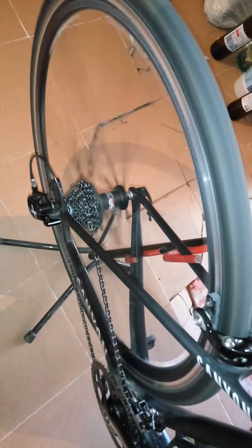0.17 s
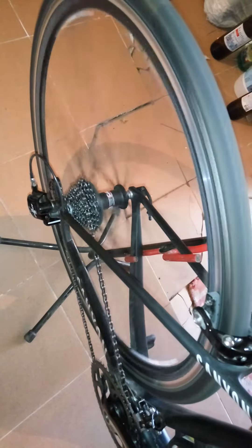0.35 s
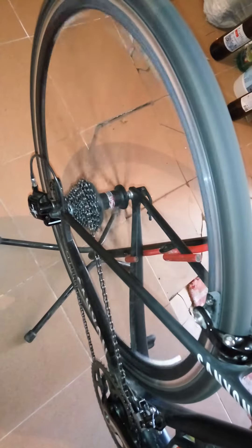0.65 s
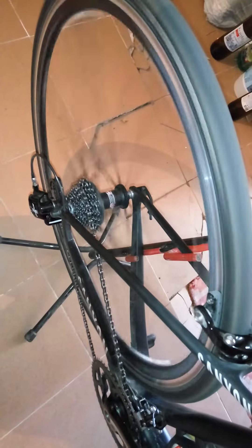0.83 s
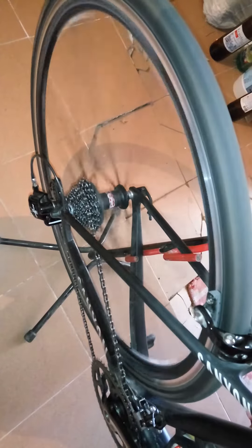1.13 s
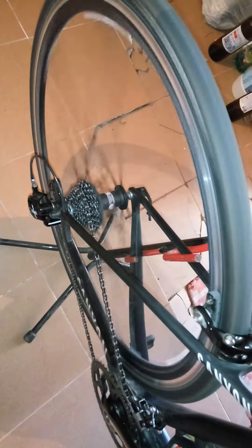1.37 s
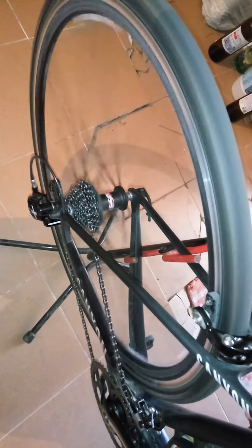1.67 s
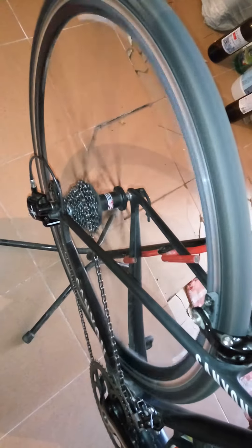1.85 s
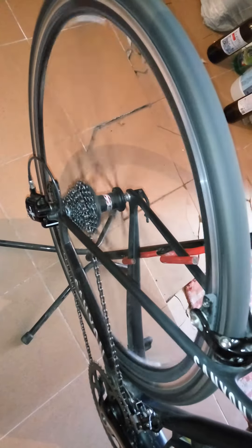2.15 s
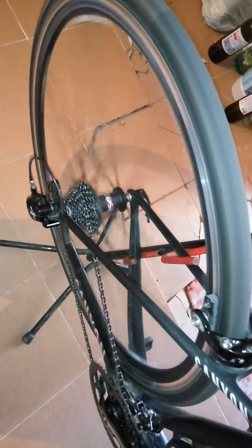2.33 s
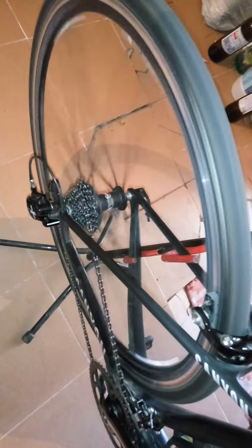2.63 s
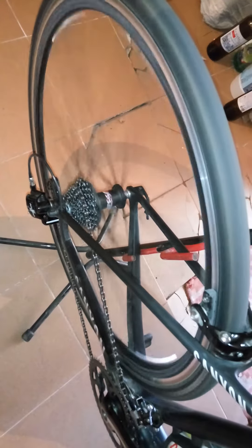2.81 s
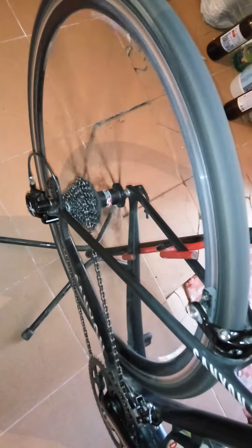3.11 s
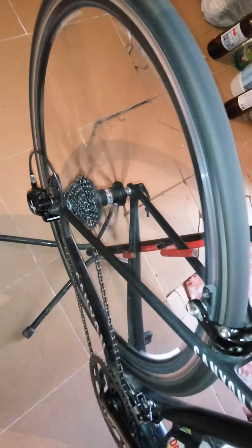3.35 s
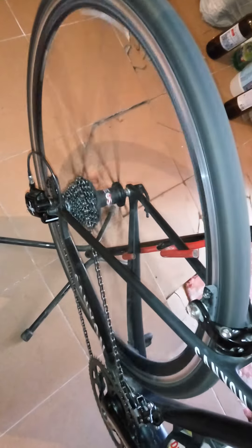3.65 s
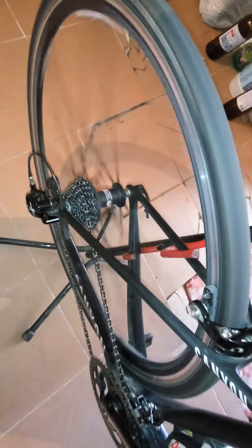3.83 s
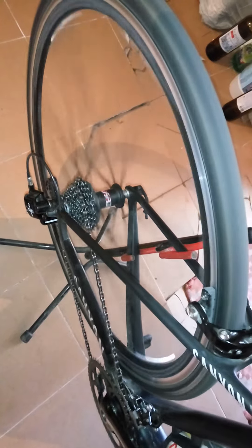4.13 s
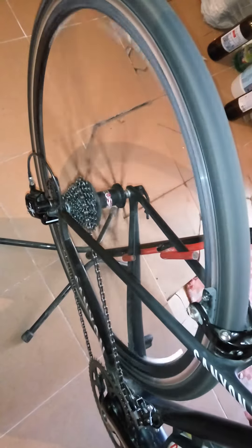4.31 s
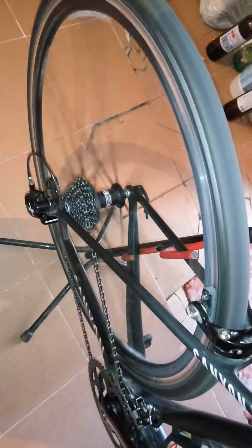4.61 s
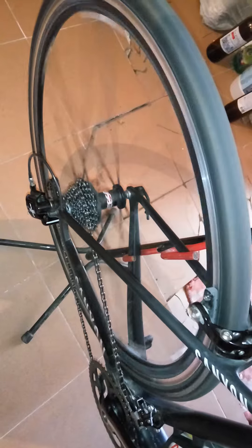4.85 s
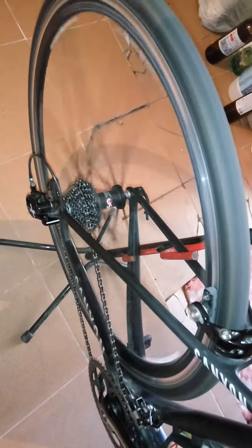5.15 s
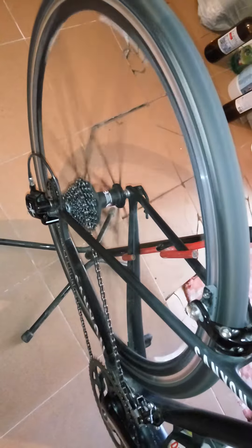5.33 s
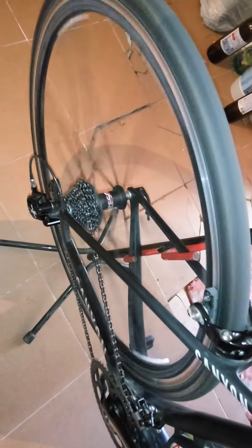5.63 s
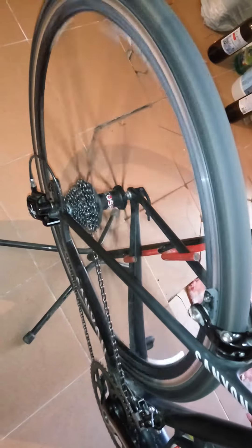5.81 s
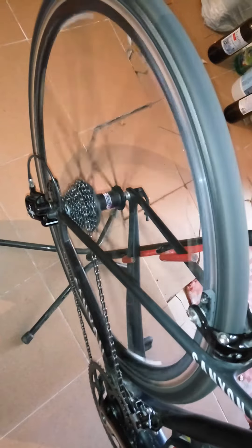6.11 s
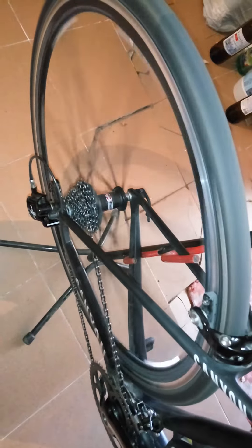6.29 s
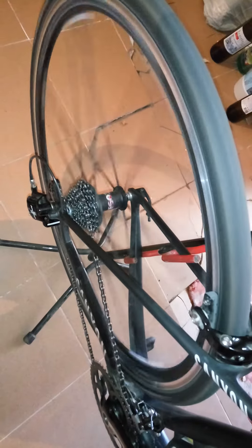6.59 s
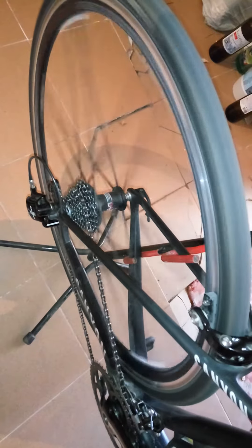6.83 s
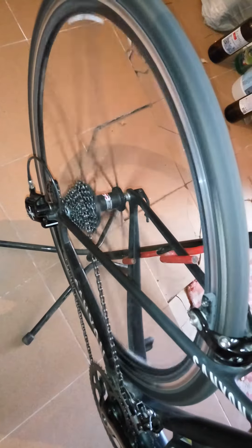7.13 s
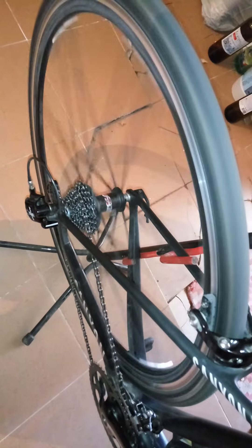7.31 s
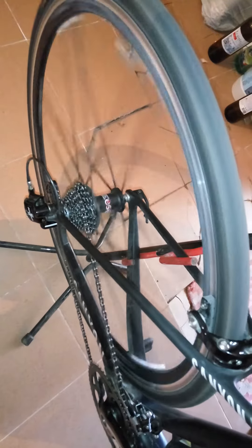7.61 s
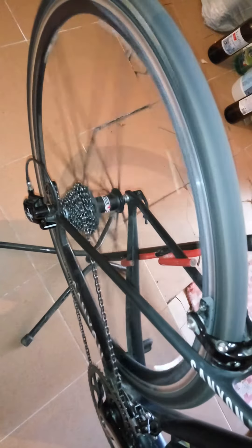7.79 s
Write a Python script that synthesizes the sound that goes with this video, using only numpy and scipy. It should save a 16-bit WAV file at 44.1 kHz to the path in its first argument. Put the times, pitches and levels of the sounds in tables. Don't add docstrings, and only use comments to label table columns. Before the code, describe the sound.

Fast metallic freewheel clicking slowly winds down in a tiled room over a faint hum, interrupted once by finger bumps and two sharp pops.

```python
import sys
import numpy as np
from scipy import signal
from scipy.fft import rfft, irfft, next_fast_len
from scipy.io import wavfile
from scipy.ndimage import uniform_filter1d, minimum_filter1d

SR = 44100
rng = np.random.default_rng(int(sys.argv[2]) if len(sys.argv) > 2 else 0)


def boost(x):
    u = np.asarray(x, float) / 20
    return 10 ** u


def bounce(signal):
    frames = np.transpose(np.atleast_2d(signal))
    limited = np.clip(frames, -1, 1)
    pcm = np.round(limited * 32767).astype(np.int16)
    wavfile.write(sys.argv[1], SR, pcm)


N = 351036


def unit(x):
    return x / np.sqrt(np.mean(x ** 2) + 1e-30)


def even(rows):
    return _even(rows)


def _even(rows):
    energy = np.sum(rows ** 2, axis=-1, keepdims=True)
    return rows / np.sqrt(energy)


def along(points, hz):
    f, v = np.transpose(points)
    return np.interp(np.log(hz + 1), np.log(f + 1), v)


# (frequency [Hz], left minus right [dB])
PORT_BALANCE = [(60, -0.5), (110, 1), (200, -2.5), (380, -1.5), (700, 6.5), (1290, -4), (2380, -3),
                (4400, 14), (8120, -10.5), (15000, 4)]


def coloured(x, spectrum, lean=0):
    hz = np.fft.rfftfreq(x.shape[-1], 1 / SR)
    sides = 1
    if lean:
        sides = boost(lean * along(PORT_BALANCE, hz) * np.array([[.5], [-.5]]))
    return unit(irfft(rfft(x) * boost(along(spectrum, hz)) * sides, x.shape[-1]))


def narrow(hz, width_hz):
    m = next_fast_len(N)
    f = np.arange(4000) * SR / m
    phasor = np.exp(2j * np.pi * rng.random((2, len(f))))
    response = 1 / (1 + (2 * (f - hz) / width_hz) ** 2)
    common, difference = unit(irfft(phasor * response, m)[:, :N])
    return common + .3 * np.array([difference, -difference])


def wobble(rate):
    knots = rng.standard_normal((2, int(N * rate / SR) + 2))
    return np.array([np.interp(np.arange(N) * rate / SR, np.arange(len(k)), k) for k in knots])


def tone(hz, drift_hz):
    drift, skew = wobble(4.7)
    phase = 2 * np.pi * np.cumsum(hz + drift_hz * drift) / SR
    return np.sqrt(2) * np.sin(phase + 0.53 * skew * np.array([[1], [-1]]))


def swells(rows, edge_s):
    t = np.arange(N) / SR
    ramps = [boost(db) * np.clip(np.minimum(t - s, s + length - t) / edge_s, 0, 1) for s, length, db in rows]
    return np.sqrt(np.sum(np.square(ramps), axis=0))


# (frequency [Hz], density [dB per Hz])
AIR = [(15, -45), (25, -16), (141, -7), (195, -2.5), (301, -10), (394, -15), (439, -12.5), (911, -15.5),
       (2610, -10), (3250, -13), (4250, -12.5), (6210, -12.5), (8140, -23.5), (12200, -24.5), (15400, -31)]
# (frequency [Hz], left-right likeness [0 to 1])
COHERENCE = [(60, 0.57), (200, 0.76), (600, .5), (1300, .03)]


def air():
    hz = np.fft.rfftfreq(N, 1 / SR)
    turn = np.arccos(np.clip(along(COHERENCE, hz), 0, 1)) / 2
    mid, side = irfft(rfft(rng.standard_normal((2, N))) * [np.cos(turn), np.sin(turn)], N)
    return boost(-69) * coloured(np.array([mid + side, mid - side]), AIR)


# (frequency [Hz], level [dB])
HUM = [
    (199.2, -75),
    (242.2, -83.5),
    (344.5, -90.5),
    (393.0, -81),
    (538.3, -87),
]
# (start [s], length [s], level [dB])
THROBS = [(-.1, 0.2, -67), (.12, 0.14, -64.5), (.32, 0.22, -66), (.6, 0.54, -77), (1.2, 0.34, -67.5),
          (1.62, 0.5, -72.5), (1.8, 0.23, -67), (2.12, .2, -71.5), (2.42, 0.95, -72.5), (3.36, 0.36, -70),
          (3.78, 0.24, -70), (4.05, 0.16, -63.5), (4.28, 0.2, -70.5), (4.66, 0.62, -71.5),
          (5.33, 0.31, -73.5), (5.7, 0.19, -74), (5.95, 0.39, -72), (6.31, 0.23, -67.5),
          (6.62, 0.39, -66.5), (7.11, 0.2, -62), (7.44, 0.22, -76), (7.76, .3, -71)]


def appliance():
    lines = sum(boost(db + 1.5 * wobble(5.7)) * tone(hz, drift_hz=0.51) for hz, db in HUM[1:])
    throb = np.hypot(boost(-80.5), swells(THROBS, edge_s=0.12))
    return lines + throb * tone(HUM[0][0] - 2.5, drift_hz=2.9)


# (start [s], length [s], level [dB], frequency [Hz])
SPELLS = [
    (0.196, .65, -82.5, 72),
    (.95, .3, -83, 105),
    (2.25, 1.25, -77, 72.6),
    (3.746, 0.53, -78.5, 68),
    (5.204, 0.29, -83.5, 69.9),
    (5.75, 0.52, -81.5, 111),
    (7.05, 0.27, -82, 100.5),
    (7.35, 0.43, -81, 67.8),
]


def rumble():
    spells = sum(swells([row[:3]], edge_s=0.11) * narrow(row[3], width_hz=18) for row in SPELLS)
    return spells + boost(-90) * narrow(75, width_hz=50)


def room():
    return air() + appliance() + rumble()


# (start [s], length [s], level [dB], hiss over it [dB])
STROKES = [
    (2.803, .03, -62, 16),
    (2.939, 0.036, -49, -13),
    (2.971, 0.07, -43, -5.5),
    (3.026, 0.058, -51, -6),
    (3.057, 0.1167, -44.5, -7),
    (3.155, .03, -56, -2),
    (3.182, 0.036, -42.5, -1),
    (3.194, 0.08, -44.5, -8.5),
]


def sliding():
    edge_s = .018
    body = swells([row[:3] for row in STROKES], edge_s)
    hiss = swells([(s, length, db + hiss_db) for s, length, db, hiss_db in STROKES], edge_s)
    t = np.arange(N) / SR
    rush_t60 = 0.11
    rush = sum((t > s + .003) * boost(db - 60 * np.abs(t - s) / rush_t60) for s, db, *_ in POPS[::2])
    rush_bands = boost([-30.5, -31.5, -35.5])[:, None]
    return np.hypot([boost(-2) * body, body, hiss], rush_bands * rush)


# (time [s], thud level [dB], thud frequency [Hz], tick level [dB])
TAPS = [(2.271, -36, 152, -70), (2.30, -48.5, 200, -77), (2.329, -55, 199, -80), (2.688, -44.5, 200, -61),
        (2.708, -43.5, 160, -72), (2.718, -51, 300, -45), (2.754, -45, 300, -47), (2.767, -40, 352, -58),
        (2.794, -41, 119, -77.5), (2.821, -34, 185, -62), (2.875, -35.5, 119, -70), (2.957, -26, 452, -49),
        (2.964, -31, 500, -24)]
# (time [s], snap level [dB], snap length [ms], recoil level [dB], crackle level [dB])
POPS = [
    (2.968, 3.5, 0.56, 5, -4),
    (2.9714, -5, 0.6, -10, -29),
    (3.1798, -1.5, 0.29, -5.5, -23),
    (2.786, -25.5, .55, -29, -24),
]
# (frequency [Hz], level [dB])
SKIN = [
    [(60, -24.5), (150, -4), (400, 1.5), (800, -11), (1500, -43)],
    [(300, -28), (700, -0.5), (1500, -4), (2800, -10), (5000, -41.5)],
    [(1500, -28), (3000, -7.5), (5500, 1.5), (7200, -8.5), (8500, -32), (13000, -40.5), (15500, -67)],
]
# (frequency [Hz], level [dB])
CRACKLE = [(2000, -29.5), (3800, -16), (5600, 5), (8000, -12.5), (11000, -8), (13500, -20.5),
           (16500, -16.5)]


def finger():
    x, t = np.zeros(N + SR), np.arange(4410) / SR
    for s, db, hz, tick_db in TAPS:
        swing = boost(db + 8 - 29 * hz * t) * (1 - np.exp(-9 * hz * t))
        thud = -np.sin(2 * np.pi * hz * t) * swing
        tick = coloured(rng.standard_normal(len(t)), SKIN[2]) * boost(tick_db - 60 * t / 0.0046)
        x[round(s * SR):][:len(t)] += thud + tick
    for s, snap_db, ms, recoil_db, crackle_db in POPS:
        hz = 152 / np.sqrt(ms)
        after = np.clip(t - ms / 1000, 0, None)
        snap = -boost(snap_db) * np.sin(np.pi * np.clip(t * 1000 / ms, 0, 1)) ** 1.8
        swing_back = np.sin(2 * np.pi * (hz * after) ** .7 * 1.1)
        recoil = boost(recoil_db - 60 * after / .0065) * swing_back
        crackle = boost(crackle_db - 60 * t / 0.0045) * coloured(rng.standard_normal(len(t)), CRACKLE)
        x[round(s * SR):][:len(t)] += snap + recoil + crackle
    grain = boost(2.0 * wobble(300)[0])
    rub = 0
    for gain, band in zip(sliding(), SKIN):
        rub = rub + gain * unit(grain * coloured(rng.standard_normal(N), band))
    port = signal.butter(3, 95, "high", fs=SR, output="sos")
    muffle = signal.butter(1, 7000, fs=SR, output="sos")
    left = signal.sosfilt(np.vstack([port, muffle]), x[:N] + rub)
    return np.array([left, np.zeros(N)])


# (count, rate [1/s], then [1/s2], [1/s3])
SPIN = (-.530, 29.0438, -.914005, .00435383)
TEETH, PAWLS = 30, 3


def ticks():
    t = np.arange(N) / SR
    passed = np.polyval(SPIN[::-1], t)
    tooth = np.arange(int(passed[-1]) + 1)
    s = np.interp(tooth, passed, t)
    rate = np.interp(s, t, np.gradient(passed) * SR)
    speed = rate / SPIN[1]
    angle = 2 * np.pi * tooth / TEETH
    heavy_spot_s = .0005
    s = s + heavy_spot_s * speed ** -3.0 * np.cos(angle)
    pawl_db = 2 * np.cos(PAWLS * angle + 2.77)
    oval_db = .5 * np.cos(2 * angle - .9)
    tick_db = -55.5 + 3 * np.log2(speed)
    return s, boost(tick_db + pawl_db + oval_db)


def laid(rows, s):
    at = (np.round(s * SR).astype(int)[:, None] + np.arange(rows.shape[-1])).ravel()
    return np.array([np.bincount(at, rows[:, c].ravel(), N + SR)[:N] for c in range(2)])


def burst(count, size, spectrum, tint_db, tint_bins):
    tint = uniform_filter1d(rng.standard_normal((count, 2, size // 2 + 1)), tint_bins, axis=2)
    noise = rfft(rng.standard_normal((count, 2, size)))
    return coloured(irfft(noise * boost(tint_db * unit(tint)), size), spectrum, lean=0.98)


# (frequency [Hz], level [dB], t60 [s])
METAL = [(1084, -12.5, 0.34), (1210, -14.5, 0.52), (1450.4, -12.5, 0.44), (1745, -9, 0.22),
         (2310, -5.5, 0.13), (2632, -0.5, .2), (3015, -7.5, 0.18), (3566, -10, .16), (4190, -6.5, 0.44),
         (4280, -3.5, 0.66), (4808, 1.5, 0.12), (5370, -2, .12), (5720, -6.5, 0.043), (5700, 1, 0.069),
         (5950, -7, .12), (6260, -8.5, .1), (7300, -18.5, .06), (9400, -19.5, 0.12), (9850, -18, 0.051),
         (11900, -21.5, .04)]


def notes(count, size):
    z = np.zeros((count, 2, size // 2 + 1), complex)
    for hz, db, t60 in METAL + METAL[3:13]:
        near = np.arange(-100, 101) + round(hz * size / SR)
        detune, loud, turn = rng.standard_normal((count, 3, 2, 1)).swapaxes(0, 1)
        off = 2j * np.pi * (near * SR / size - hz * (1 + .008 * detune))
        fade = np.log(1000) / min(t60, .26)
        build = 1 / 0.0012
        phase = np.exp(9j * turn - 2j * np.pi * near * 44 / size)
        z[..., near] += boost(db + 5 * loud) * phase / (fade + off) / (build + off)
    return even(irfft(z, size))


# (frequency [Hz], density [dB per Hz])
CRACK = [(290, -45), (500, -14), (530, -10.5), (1230, -17.5), (1320, -23), (1690, -4.5), (3200, -5.5),
         (4280, -1), (6330, 0.5), (8090, -18), (12100, -13.5), (15400, -27)]
# (frequency [Hz], density [dB per Hz])
WASH = [(410, -41), (700, -18.5), (1330, -14), (2630, -1), (3200, -6), (4320, -6.5), (6230, -10.5),
        (8210, -19), (12200, -19), (15400, -27)]


def freehub():
    s, force = ticks()
    count, size = len(s), 8192
    t = np.arange(size) / SR
    late = 0.0012 * np.cumsum(rng.gamma(2, .5, (count, PAWLS)), axis=1) - .0012
    since = np.clip(t[:2048] - np.clip(late, 0, .0045)[..., None], 0, None)
    pawl = boost(rng.normal(0, 2.2, (count, PAWLS, 1)))
    decay = boost(-60 * since / .011) + boost(-7.5 - 60 * since / 0.065)
    hit = decay * (1 - np.exp(-since / 0.00028))
    shape = np.sqrt(np.sum((pawl * hit) ** 2, axis=1))[:, None]
    crack = even(shape * burst(count, size=2048, spectrum=CRACK, tint_db=5, tint_bins=22))
    wash_shape = boost(-60 * t / 0.14) * (1 - np.exp(-t / 0.0037))
    wash = even(wash_shape * burst(count, size, WASH, tint_db=0.5, tint_bins=40))
    force = force[:, None, None] * boost(rng.normal(0, .6, (count, 2, 1)))
    ringing = boost(22.0) * wash + boost(26.5) * notes(count, size)
    return laid(force * boost(26.0) * crack, s) + laid(force * ringing, s)


def scene():
    return freehub() + room() + finger()


# (frequency [Hz], weakest kept line over the usual level [dB])
THRESHOLD = [(4500, -40), (6000, -14), (7400, -6), (8200, 3), (8900, -1), (11000, 0), (12500, -1),
             (13200, 8), (15300, 8), (15600, 34)]


def thinned(x, size):
    hz, t, z = signal.stft(x, SR, "cosine", size)
    level = np.abs(z)
    median = np.median(level[..., ::3], axis=2, keepdims=True)
    usual = uniform_filter1d(median, size // 80, axis=1)
    luck_db = rng.normal(0, 4.6, (50, 400)) + rng.normal(0, 1.6, 400)
    luck_db = luck_db[(hz // 500).astype(int)][:, (t // .0232).astype(int)]
    kept = level > usual * boost(along(THRESHOLD, hz)[:, None] + luck_db)
    return signal.istft(z * kept, SR, "cosine", size)[1][:, :N]


def camera(x):
    calm = minimum_filter1d(np.abs(x[0]) < .05, 4096)
    chance = np.repeat(rng.random(N // 3072 + 1), 3072)[:N]
    long = uniform_filter1d(1. * (calm & (chance < .55)), 256)
    return long * thinned(x, size=2048) + (1 - long) * thinned(x, size=384)


def low_pass(x):
    return signal.sosfilt(signal.butter(12, 16820, fs=SR, output="sos"), x)


def record(dry):
    gain = boost(-2.5 * np.clip((np.arange(N) / SR - 7.55) / .1, 0, 1))
    mix = camera(np.clip(gain * dry, -1, 1))
    return low_pass(mix)


dry = scene()
out = record(dry)
bounce(out)
```